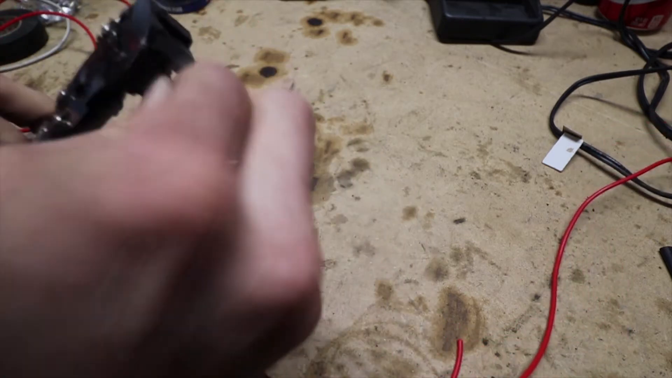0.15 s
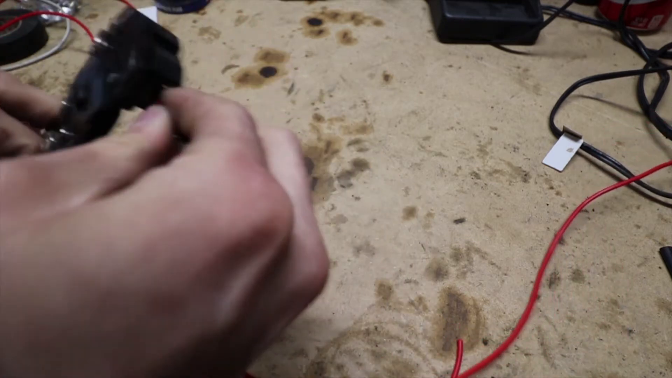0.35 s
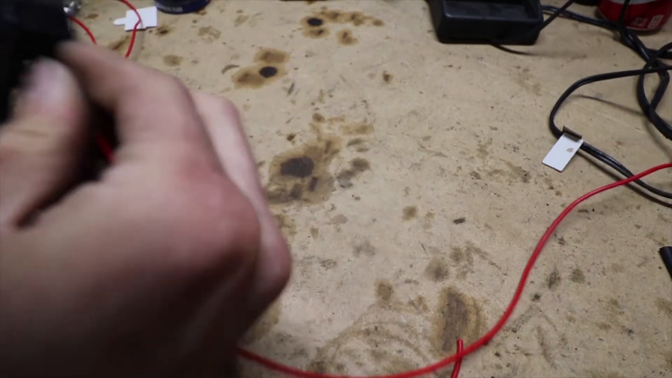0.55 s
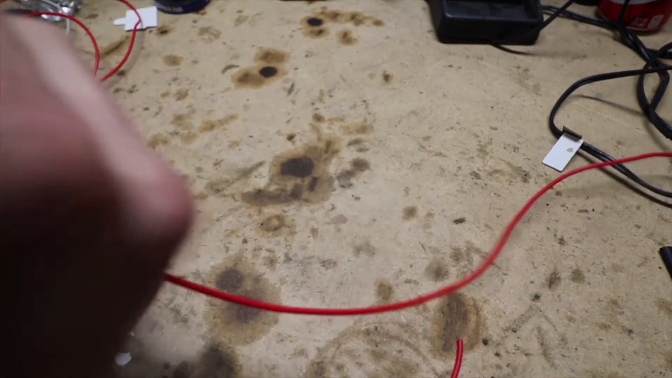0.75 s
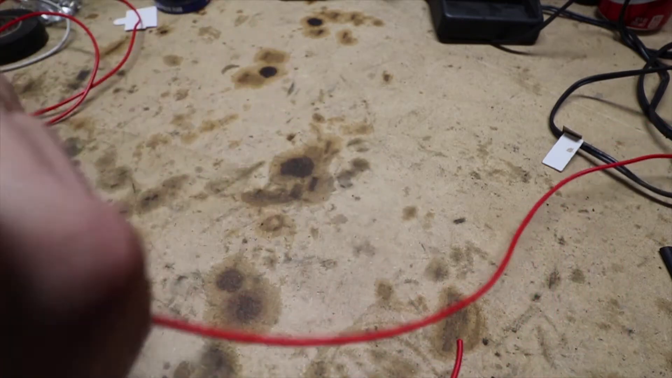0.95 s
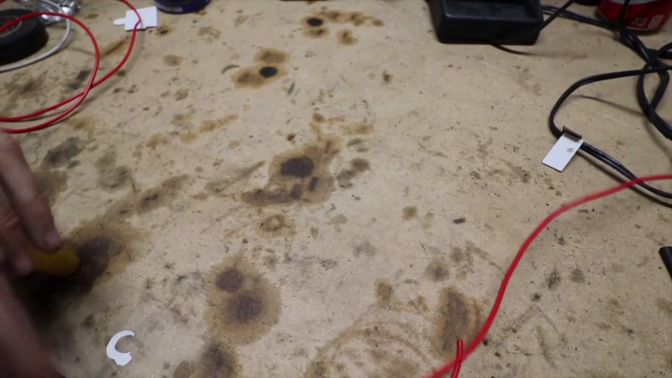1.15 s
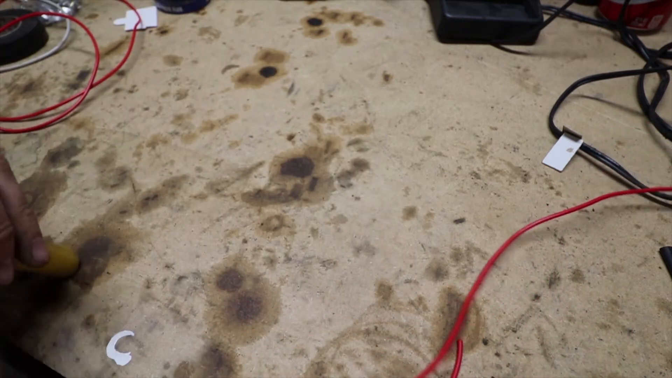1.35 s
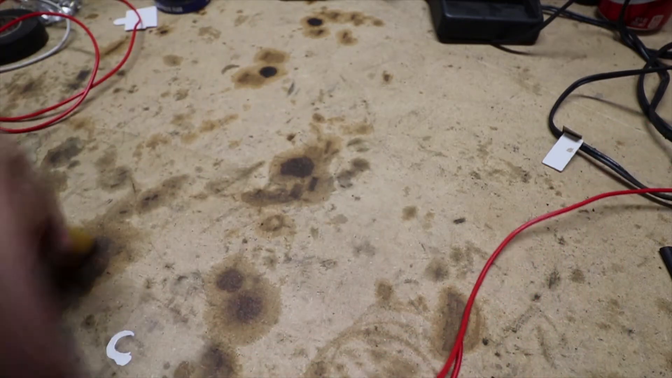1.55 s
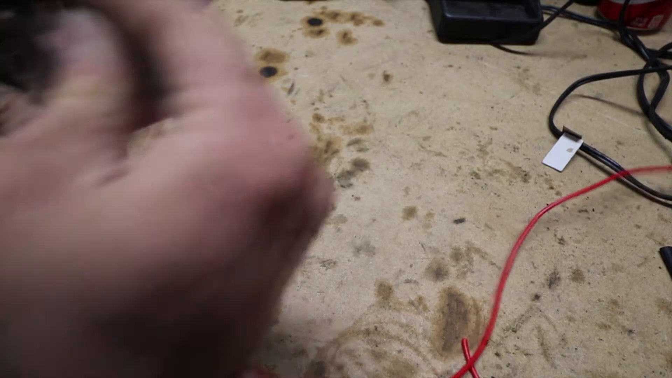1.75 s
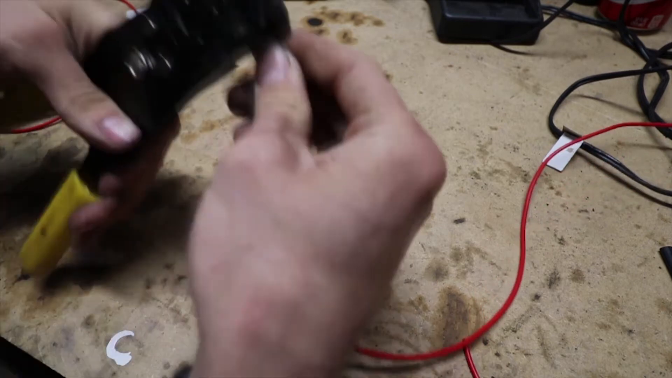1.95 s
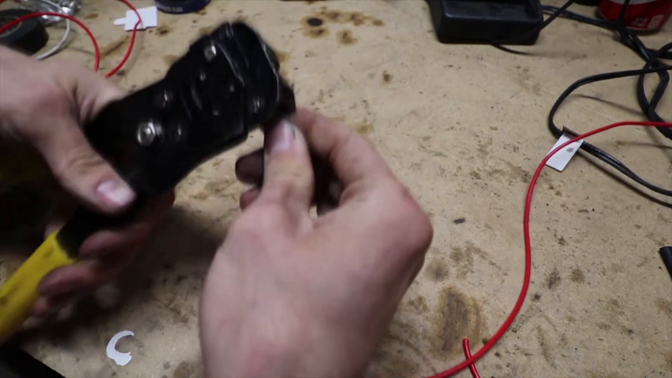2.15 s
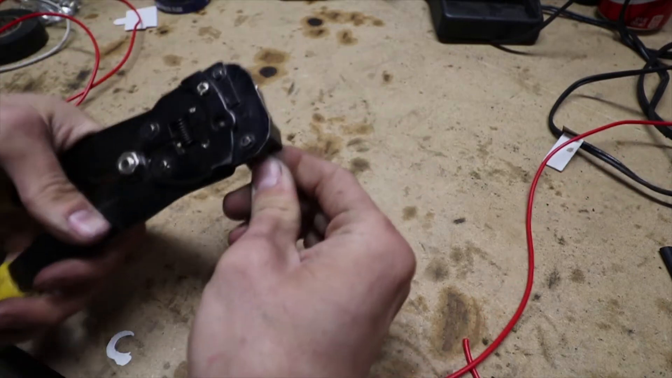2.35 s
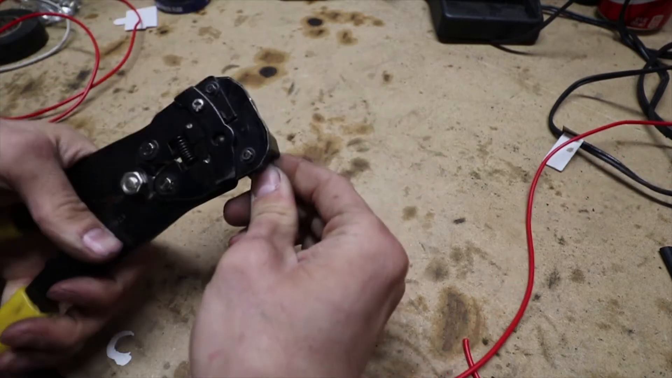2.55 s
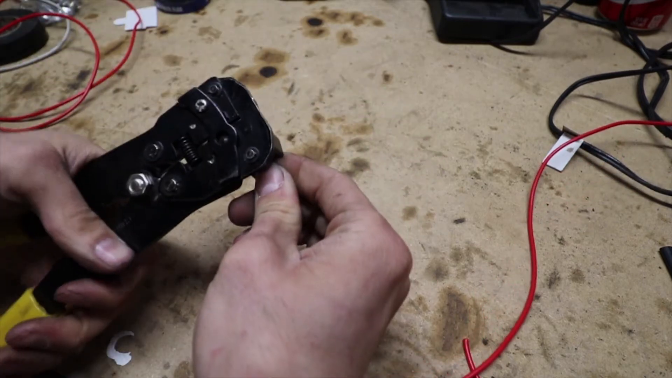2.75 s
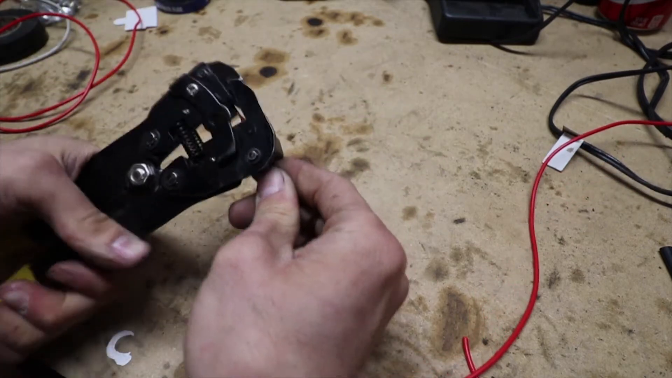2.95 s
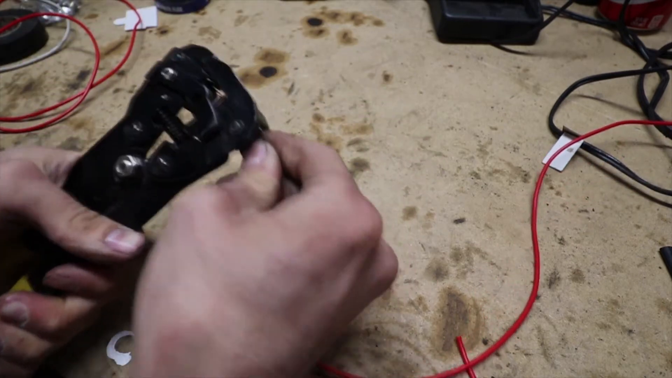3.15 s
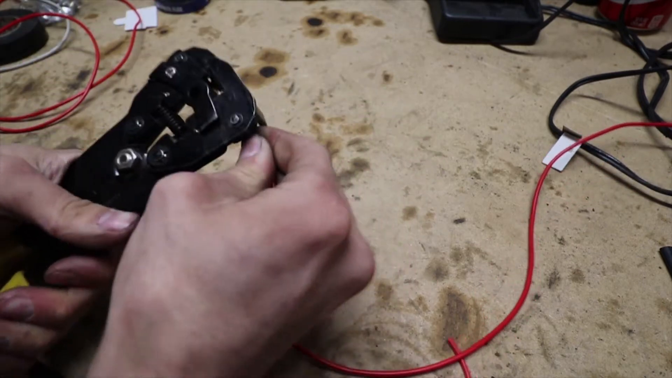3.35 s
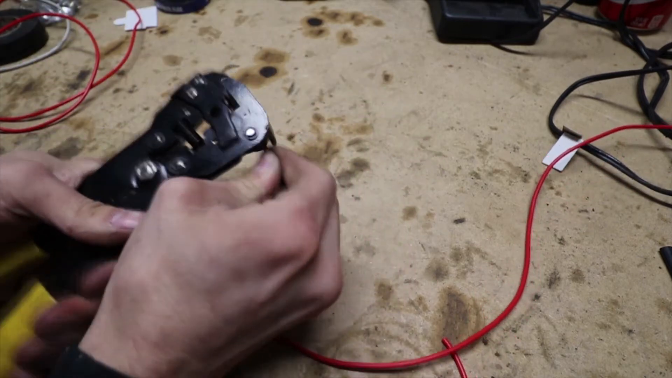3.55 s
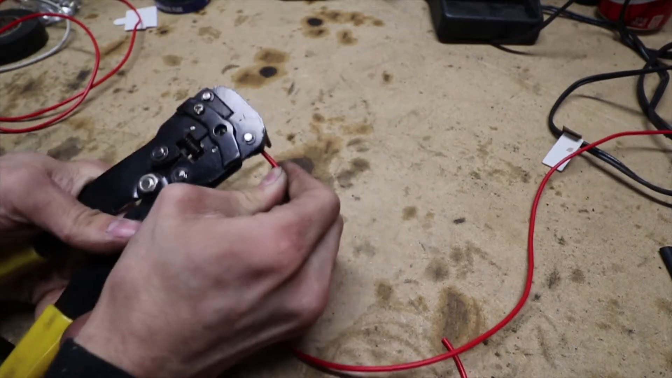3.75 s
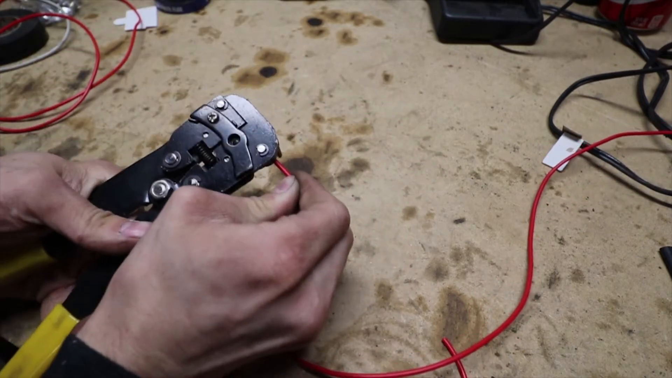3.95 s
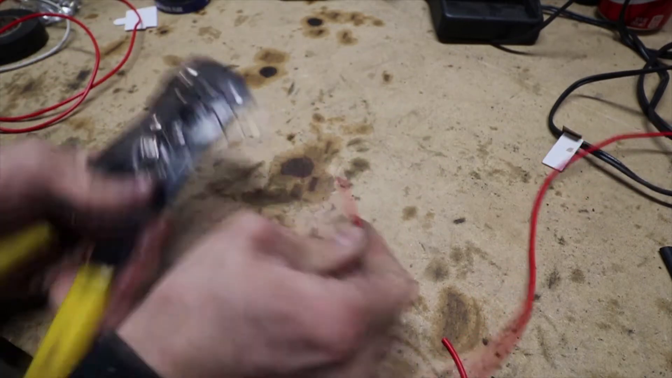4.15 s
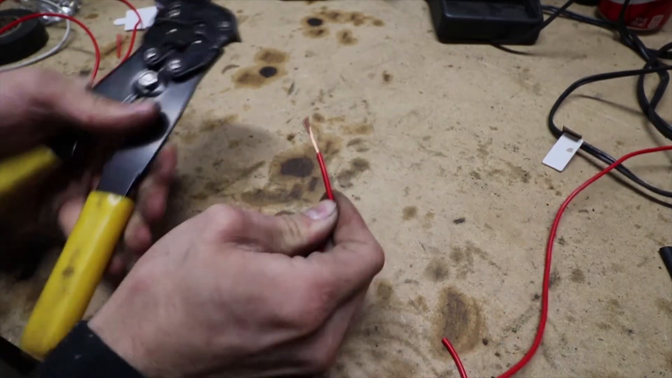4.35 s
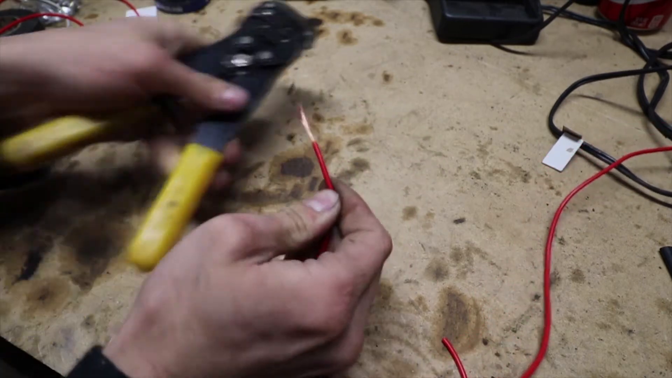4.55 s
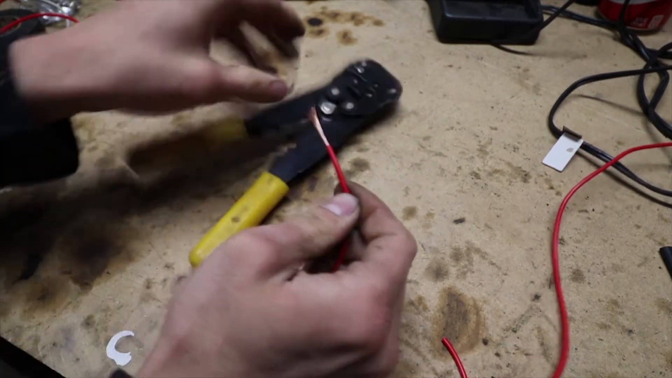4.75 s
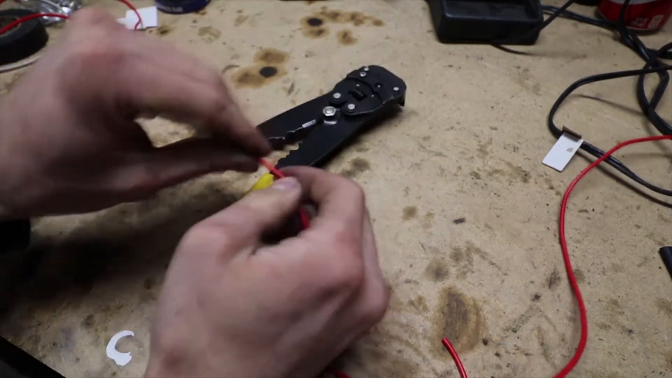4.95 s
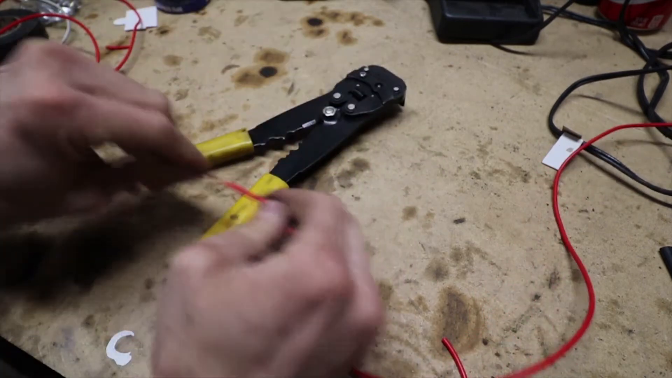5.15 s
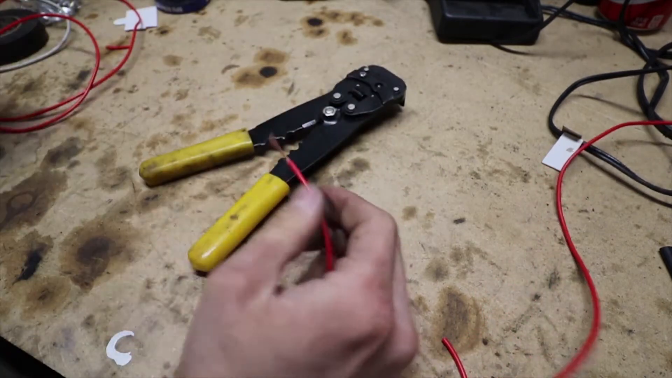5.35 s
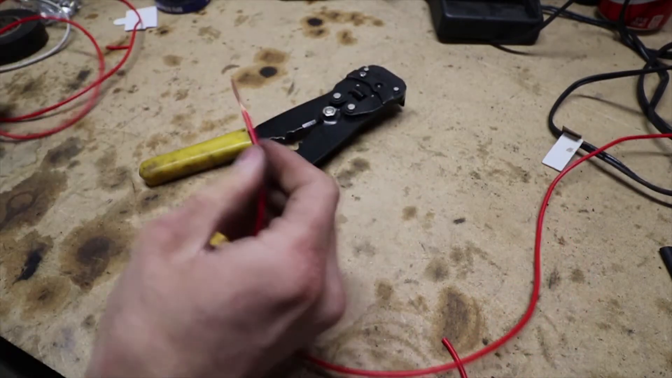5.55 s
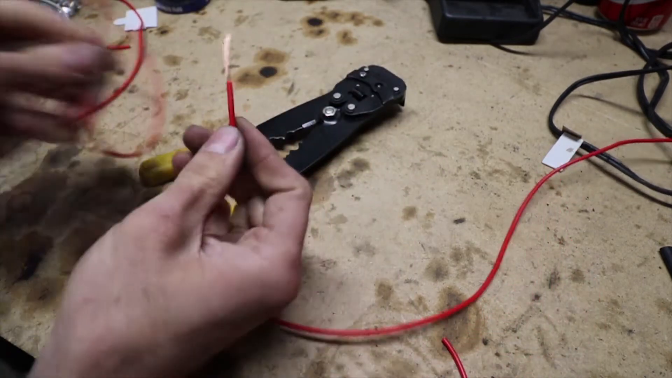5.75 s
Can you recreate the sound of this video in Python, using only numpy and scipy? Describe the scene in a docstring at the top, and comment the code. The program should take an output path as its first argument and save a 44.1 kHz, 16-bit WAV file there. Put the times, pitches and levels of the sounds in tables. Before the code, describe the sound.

Close over a wooden workbench in a small room, a steel wire stripper gives scattered faint clicks and soft hand rubs. Its jaws snap sharply, snap again, then tear insulation with a brief crunchy rip. The tool drops with a loud clatter, rattles and settles, followed by light taps and rubbing.

```python
"""Wire stripper on a workbench

A spring-loaded steel wire stripper is handled close to a microphone over a wooden workbench.
Links click as struck resonances, the jaws snap and tear insulation off in dense stick and slip, the spring sings.
The dropped tool bounces, rocks and rattles on ringing bench modes; rubbing strokes are showers of small slips.
Filtered noise makes the rumble and hiss below; filtered decaying noise makes the reflections."""
import sys
import numpy as np
from scipy import signal
from scipy.fft import rfft, irfft, next_fast_len
from scipy.io import wavfile
from scipy.ndimage import uniform_filter1d

SR = 44100
rng = np.random.default_rng(int(sys.argv[2]) if len(sys.argv) > 2 else 0)


def volts_from_db(level):
    """Convert decibel levels to linear amplitude ratios."""
    exponent = np.asarray(level, float) / 20
    return 10 ** exponent


def unload_wav(signal):
    """Save mono or channel-first audio to the path in sys.argv[1] as 16-bit WAV at rate SR, clipped to [-1, 1]."""
    wavfile.write(
        sys.argv[1],
        SR,
        np.round(np.clip(np.atleast_2d(signal).T, -1, 1) * 32767).astype(np.int16),
    )


N = 255559   # length in samples


def rms_one(x):
    """Scale to rms 1."""
    return x / np.sqrt(np.mean(x ** 2) + 1e-20)


def along(at_s, level_db):
    """Gain along a curve in dB, practically silent outside it."""
    return volts_from_db(np.interp(np.arange(N) / SR, at_s, level_db, left=-200, right=-200))


def resonances(table, size):
    """Complex response of each damped mode (pitch_hz, width_hz, level_db) on an FFT grid."""
    hz, width_hz, level_db = (column[:, None] for column in np.transpose(table))
    f = np.fft.rfftfreq(size, 1 / SR) + 1e-3   # keeps clear of zero
    signs = (-1.) ** np.arange(len(table))[:, None]   # neighbours in opposite polarity
    return signs * volts_from_db(level_db) / (1 + 1j * (f ** 2 - hz ** 2) / (f * width_hz))


def coloured(x, table):
    """A signal sent through parallel resonances, then scaled to rms 1."""
    size = next_fast_len(N)
    response = resonances(table, size).sum(axis=0)
    return rms_one(irfft(rfft(x, size) * response, size)[:N])


def steady(spectrum, level_db):
    """Steady noise: white noise shaped by a spectrum curve and set to an rms level."""
    size = next_fast_len(N)
    hz, colour_db = np.transpose(spectrum)
    log_f = np.log(np.fft.rfftfreq(size, 1 / SR) + 1)
    colour = volts_from_db(np.interp(log_f, np.log(hz), colour_db))
    noise = irfft(rfft(rng.standard_normal(size)) * colour, size)[:N]
    return volts_from_db(level_db) * rms_one(noise)


# spectrum of room rumble and microphone hiss: pitch_hz, relative level_db
FLOOR_SPECTRUM = [(12, -68), (20, -74), (46, -6), (91, -6.5), (150, -4.5), (329, -7.5), (368, -8),
                  (412, -8), (461, -9.5), (954, -16), (1870, -20), (2090, -21.5), (5120, -23.5),
                  (14800, -28), (16100, -33)]


def floor_noise():
    """Room rumble and microphone hiss as one noise, alike in both channels."""
    return steady(FLOOR_SPECTRUM, level_db=-52)


# spectrum of the preamplifier hiss: pitch_hz, relative level_db
HISS_SPECTRUM = [(18, -30), (30, -1), (338, -5), (375, -1), (463, -6), (4330, -6.5), (14500, -6),
                 (16100, -18)]


def preamp_hiss():
    """A trace of preamplifier hiss, in opposite polarity in the two channels."""
    return steady(HISS_SPECTRUM, level_db=-64) * [[1], [-1]]


# handle modes: pitch_hz, width_hz (before the grip broadens it), level_db
HANDLE = [(872, 150, -1.5), (1417, 49, 3), (1592, 32, 3.5), (1846, 94, -1.5), (2185, 150, -5),
          (2820, 180, -5.5), (3500, 86, -12), (4030, 28, -3), (4580, 47, -10.5)]
# broad resonances of finger hiss: pitch_hz, width_hz, level_db
FINGERS = [(2610, 1200, -1), (4300, 1960, -1), (5400, 790, 2.5), (6760, 3600, -10), (9900, 5000, -13)]


def handle_and_fingers(grains_per_s=1800, grain_db=2.0):
    """Dense uneven slips of either sign ring the handle and hiss under the fingers."""
    slips = rng.random((2, N)) < grains_per_s / SR
    strength = volts_from_db(grain_db * np.minimum(rng.exponential(1, (2, N)), 4))
    slips = slips * strength * rng.choice([-1, 1], (2, N))
    damped_handle = [(hz, 2 * width_hz, level_db) for hz, width_hz, level_db in HANDLE]   # by the grip
    return coloured(slips[0], damped_handle), coloured(slips[1], FINGERS)


def blend(handle, fingers, handle_db):
    """Mix dull handle and bright fingers at constant power; handle_db is handle over fingers."""
    share = volts_from_db(handle_db)
    return (share * handle + fingers) / np.sqrt(1 + share ** 2)


# strokes of hands on tool, wire and bench: start_s, length_s, peak_db, handle_over_fingers_db
STROKES = [(0.324, 0.077, -58, 6), (0.411, .12, -56, 8), (0.689, 0.056, -56, 0), (0.769, 0.14, -59, -14),
           (1.037, 0.095, -55.5, -17), (1.11, .13, -54.5, 0), (1.3, .07, -56, 16), (1.37, 0.084, -57, 10),
           (1.553, 0.024, -51, 16), (1.726, 0.17, -49, 6), (1.852, .12, -40, 5), (1.961, .04, -46.5, -1),
           (2.057, .07, -50.5, 4), (2.138, 0.19, -62, 8), (2.601, 0.045, -56, -4), (2.753, .05, -61, 13),
           (3.578, .17, -55, -6), (3.781, 0.041, -55, 1), (4.13, 0.12, -59, -3), (4.355, 0.17, -56, -11),
           (4.487, 0.31, -55.5, -15), (5.207, 0.14, -44, -6.5), (5.358, 0.063, -46.5, 5),
           (5.44, .14, -49.5, 7), (5.591, 0.083, -48.5, 6), (5.683, 0.18, -45, 5)]
STROKE_PEAK_AT, STROKE_EDGE_DB = 0.52, -11.5   # peak as a share of the length; ends relative to it
FLICKER_DB, FLICKERS_PER_S = 2.5, 30   # the grip is uneven


def rubbing():
    """Each stroke swells and fades over slip noise whose level flickers at random."""
    handle, fingers = handle_and_fingers()
    steps = rng.standard_normal(1000)
    flicker_db = FLICKER_DB * np.interp(np.arange(N) / SR * FLICKERS_PER_S, np.arange(1000), steps)
    flicker = volts_from_db(flicker_db)
    out = np.zeros(N)
    for start_s, length_s, peak_db, handle_db in STROKES:
        at_s = [start_s, start_s + STROKE_PEAK_AT * length_s, start_s + length_s]
        swell = along(at_s, peak_db + np.array([STROKE_EDGE_DB, 0, STROKE_EDGE_DB]))
        out += flicker * swell * blend(handle, fingers, handle_db)
    return out


# the dropped tool settles on the bench: at_s, rocking_db, rattle_db (loose parts)
SETTLING = [(4.76, -36, -47), (4.79, -30.5, -37), (4.81, -37, -35), (4.85, -27.5, -36), (4.87, -24.5, -36),
            (4.895, -30.5, -32), (4.92, -28.5, -36), (4.96, -41, -41), (5.0, -63, -45), (5.06, -53, -50.5),
            (5.219, -67, -56)]


def rattle():
    """Loose parts of the dropped tool rattle as slip noise, more handle than fingers."""
    at_s, _, rattle_db = np.transpose(SETTLING)
    return along(at_s, rattle_db) * blend(*handle_and_fingers(), handle_db=4)


# bench top modes: pitch_hz, level_db, t60_s (ringing free)
BENCH = [(157, 1, 0.12), (200, -6, 0.041), (270, -4, 0.065), (396, 0.5, 0.088), (496, -1, 0.063),
         (648, -7, 0.049), (738, -3, 0.045), (983, 0.5, 0.08), (1353, 1, 0.032), (1515, -29, 0.042)]


def rocking(touches_per_s=900, damping=2.1, soft_hz=600):
    """Rapid uneven touches keep the bench modes sounding, broadened by the weight on them."""
    modes = []
    for hz, level_db, t60_s in BENCH:
        width_hz = damping * np.log(1000) / (np.pi * t60_s)
        soft_db = -20 * np.log10(1 + (hz / soft_hz) ** 2)   # soft grips leave the upper modes weak
        modes.append((hz, width_hz, level_db + soft_db))
    touches = (rng.random(N) < touches_per_s / SR) * rng.standard_normal(N)
    at_s, rocking_db, _ = np.transpose(SETTLING)
    return along(at_s, rocking_db) * coloured(touches, modes)


# return spring mode: pitch_hz, level_db, t60_s
SPRING = [(3650, -1, 0.66)]


def spring(let_go_s=3.777, spring_db=-55):
    """The return spring sings thinly, a decaying sine, once the jaws let go."""
    t = np.maximum(np.arange(N) / SR - let_go_s, 0)   # zero, so silent, until then
    out = np.zeros(N)
    for hz, level_db, t60_s in SPRING:
        out += volts_from_db(spring_db + level_db - 60 * t / t60_s) * np.sin(2 * np.pi * hz * t)
    return out


# knocks on the bench top: at_s, peak_db, strongest_hz, spread_octaves, share_of_free_t60
KNOCKS = [(1.74, -38, 160, 0.66, 0.52), (2.828, -32.5, 1010, 0.39, 0.28), (2.982, -29, 1000, 0.77, 0.3),
          (4.753, -17.5, 800, 2.1, 0.9), (4.778, -6, 925, 1.4, 0.57), (4.809, -25, 260, 1, 1),
          (4.856, -9.5, 340, 0.91, 0.89), (4.912, -18, 376, 1.9, 0.46), (5.288, -25, 750, 0.41, 0.18),
          (5.413, -23, 400, 1, 0.23)]


def knocks(settle_db=-24, settle_t60_s=0.032):
    """A push and a short noisy settling ring the bench modes, most near each blow's strongest pitch."""
    out, t = np.zeros(N + SR), np.arange(SR // 4) / SR
    hz, level_db, t60_s = (column[:, None] for column in np.transpose(BENCH))
    for at_s, peak_db, strongest_hz, octaves, share in KNOCKS:
        luck_db = 1.5 * rng.standard_normal((len(BENCH), 1))   # no two blows ring the modes alike
        focus = np.exp(-.5 * (np.log2(hz / strongest_hz) / octaves) ** 2)
        # a hand or tool left lying damps the ring
        dying = volts_from_db(level_db + luck_db - 60 * t / (share * t60_s))
        push = (focus * dying * np.sin(2 * np.pi * hz * t)).sum(axis=0)
        settling = rng.standard_normal(len(t)) * volts_from_db(settle_db - 60 * t / settle_t60_s)
        ring = push + signal.fftconvolve(push, settling)[:len(t)]
        out[int(at_s * SR):][:len(t)] += volts_from_db(peak_db) * ring / np.abs(ring).max()
    return out[:N]


# modes of the tool's frame: pitch_hz, width_hz, level_db
FRAME = [(800, 183, -1), (1030, 175, 1.5), (1330, 242, 2.5), (1530, 680, 0), (1910, 620, -6.5)]
# modes of its links: pitch_hz, width_hz, level_db
LINKS = [(2313, 326, -3.5), (2627, 95, 1), (3086, 590, -3), (3970, 760, -6.5), (4300, 327, -3),
         (4830, 750, -2.5), (5500, 1150, -1.5), (6220, 650, -3.5), (6590, 195, -6), (7470, 510, -9)]
# modes of its cutting edges: pitch_hz, width_hz, level_db
EDGES = [(7920, 400, -2), (9520, 1600, -2), (11060, 1400, -4), (12800, 2100, -10.5), (15300, 1500, -30),
         (14260, 540, -21)]
# the blades drag the insulation off the wire: at_s, level_db
TEAR = [(4.198, -52), (4.205, -38), (4.214, -51), (4.218, -25), (4.234, -26.5), (4.24, -31), (4.247, -27),
        (4.255, -54)]
TEAR_FRAME_DB, TEAR_EDGE_DB = -12, -4.5   # relative to the links
TEAR_HZ, TEAR_FOCUS_DB = 5500, 6   # links near this pitch ring most; loss one octave away


def tear(slips_per_s=5000):
    """Dense stick and slip of the blades rings the whole tool."""
    slips = (rng.random(N) < slips_per_s / SR) * rng.standard_normal(N)
    focused_links = [(hz, width_hz, level_db - TEAR_FOCUS_DB * np.log2(hz / TEAR_HZ) ** 2)
                     for hz, width_hz, level_db in LINKS]
    tool = coloured(slips, focused_links)
    tool = tool + volts_from_db(TEAR_FRAME_DB) * coloured(slips, FRAME)
    tool = tool + volts_from_db(TEAR_EDGE_DB) * coloured(slips, EDGES)
    return along(*np.transpose(TEAR)) * rms_one(tool)


# steel contacts: at_s, level_db (links), brightest_hz, frame_db and edge_db (relative to level_db)
CLICKS = [(0.1106, -19.5, 4250, -12.5, -14), (0.1217, -31.5, 5540, -20, -15),
          (0.1248, -28.5, 5430, -24, -18), (0.244, -40.5, 4640, -11, -18), (0.325, -36, 5400, -9, -5),
          (0.5726, -33.5, 4400, -10.5, -7), (0.5806, -35, 5040, -13, -15), (0.67, -42, 6040, -2, 2),
          (0.6792, -26.5, 3930, -17, -15), (0.751, -34.5, 4900, -25, -3),
          (0.8456, -30.5, 5200, -13.5, -5.5), (0.8547, -30.5, 5900, -30, -12), (0.941, -39, 3660, -24, -9),
          (1.1137, -38.5, 3350, -7, -9), (1.193, -42.5, 4700, -2, -9), (1.3673, -41, 5350, -5, -13),
          (1.6281, -33, 4730, -23, -29), (1.887, -36, 5500, -21, -1.5), (2.072, -40, 2570, 3, -18),
          (2.0752, -38, 2250, 0, -17), (2.0902, -41.5, 2320, -11, -22), (2.142, -43, 4530, -16, -13),
          (2.8607, -34, 5200, -7, -26), (2.865, -37, 5100, -14, -12), (2.9695, -45, 5100, -22, -16),
          (2.9766, -17, 5500, -16, -20), (2.9816, -10, 3840, -8.5, -7.5), (3.032, -41, 4240, -19, -9),
          (3.49, -42.5, 3500, -4, -20), (3.635, -44, 4300, -1, -6), (3.7071, -36.5, 5340, -17, -13),
          (3.7523, -18, 6240, -15.5, -2), (3.7717, -15.5, 5900, -25, -12), (3.7732, -19.5, 5500, -18, -10),
          (3.776, -21, 5440, -16, -0.5), (3.7923, -33, 3500, -13, -10), (4.2258, -13, 5400, -20, 2.5),
          (4.2311, -10.5, 5330, -17.5, -4), (4.2434, -14.5, 5500, -29, 2), (4.246, -13.5, 4470, -15.5, -9),
          (4.3376, -26.5, 4460, -9, -3.5), (4.3431, -22, 5370, -7.5, -12), (4.354, -33, 3550, -3.5, -14),
          (4.468, -34, 5000, -13, -8), (4.47, -29, 5140, -8.5, -7), (4.4745, -26.5, 5240, -14, -6),
          (4.537, -39, 4700, -9, -6), (4.7525, -18.5, 3500, -9, -22), (4.7552, -5.5, 4850, -18, -14),
          (4.7595, -18, 5300, -5, 5), (4.778, -1, 4430, 2, -11), (4.7881, -28, 4400, 4, 9.5),
          (4.8141, -19, 2710, -4, -13), (4.8574, -8.5, 4600, -1.5, -9), (4.883, -18, 3600, -16, -17),
          (4.914, -32, 4500, -6, 2), (5.223, -41, 6500, -14, 3), (5.4126, -21.5, 4200, -3.5, -36),
          (5.446, -31, 4470, -20, -10), (5.6038, -37.5, 3200, -3, -10)]
# a faint tick of a loose link in each stroke: middle level and its spread, usual pitch, relative levels
TICK_DB, TICK_SPREAD_DB, TICK_HZ, TICK_FRAME_DB, TICK_EDGE_DB = -49, 4, 4400, -7, -12


def contacts():
    """The listed contacts and one faint tick at a random place in each stroke, as columns."""
    start_s, length_s = np.transpose(STROKES)[:2]
    tick_s = np.minimum(start_s + rng.random(len(start_s)) * length_s, N / SR)
    luck = rng.standard_normal((2, len(start_s)))
    ticks = [(at_s, TICK_DB + TICK_SPREAD_DB * a, TICK_HZ * 1.1 ** b, TICK_FRAME_DB, TICK_EDGE_DB)
             for at_s, a, b in zip(tick_s, *luck)]
    return np.transpose(CLICKS + ticks)


CHATTER_T60_S = 0.014
EDGE_LEAN_DB, PLAIN_HZ = 30, 4900   # dB per octave of edge mode, per octave of brightness above plain


def clicks(focus_octaves=0.4, size=2048):
    """Each contact is a sharp strike and a dying chatter that ring frame, links and cutting edges."""
    at_s, level_db, brightest_hz, frame_db, edge_db = contacts()
    t = np.arange(size) / SR
    force = rng.standard_normal((len(at_s), size)) * volts_from_db(-60 * t / CHATTER_T60_S)
    force[:, 0] = 8   # the strike
    luck = volts_from_db(1.5 * rng.standard_normal((len(at_s), 32)))   # uneven mode strengths
    # the place of the contact favours the link modes near its brightest pitch
    octaves = np.log2(np.array(LINKS)[:, 0] / brightest_hz[:, None])
    focus = 0.23 + np.exp(-.5 * (octaves / focus_octaves) ** 2)
    # bright contacts also lean toward the highest edge modes
    brightness = np.log2(brightest_hz[:, None] / PLAIN_HZ)
    lean = volts_from_db(EDGE_LEAN_DB * brightness * np.log2(np.array(EDGES)[:, 0] / EDGES[0][0]))
    bursts = 0
    for table, weight, rel_db in ((FRAME, 1, frame_db), (LINKS, focus, 0), (EDGES, lean, edge_db)):
        strengths = weight * luck[:, :len(table)]
        ring = irfft(rfft(force) * (strengths @ resonances(table, size)), size)
        # approximate peak, from the strongest 40 samples
        top = np.sqrt(2 * uniform_filter1d(ring ** 2, size=40).max(axis=1))
        bursts = bursts + ring * (volts_from_db(level_db + rel_db) / top)[:, None]
    out = np.zeros(N + size)
    for first, burst in zip((at_s * SR).astype(int) - 8, bursts):   # 8 samples ahead
        out[first:first + size] += burst
    return out[:N]


# reflections by band: centre_hz, t60_s, level_db
ROOM = [(200, 0.71, -12.5), (700, 0.48, -15.5), (1860, 0.36, -13.5), (3200, 0.18, -20.5), (5400, 0.47, -19),
        (7800, 0.29, -13), (11800, 0.19, -14.5)]
EARLY_T60_S, EARLY_DB = 0.027, 4.5   # the quick scatter, relative to the tail


def room(x, delay_s=.003):
    """Dense reflections: a quick scatter off the cluttered bench and a tail dying at each band's rate."""
    t = np.arange(SR // 2) / SR
    centres = np.array(ROOM)[:, 0]
    edges = np.r_[60, np.sqrt(centres[1:] * centres[:-1]), 16000]
    early = volts_from_db(-60 * t / EARLY_T60_S)
    early = volts_from_db(EARLY_DB) * early / np.sqrt(np.sum(early ** 2))
    response = 0
    for (_, t60_s, level_db), low, high in zip(ROOM, edges, edges[1:]):
        late = volts_from_db(-60 * t / t60_s)
        dying = late / np.sqrt(np.sum(late ** 2)) + early
        white = volts_from_db(level_db) * dying * rng.standard_normal(len(t))
        band = signal.butter(2, [low, high], "band", fs=SR, output="sos")
        response = response + signal.sosfilt(band, white)
    delay = np.zeros(int(delay_s * SR))
    return signal.fftconvolve(x, np.r_[delay, response])[:N]


def scene():
    """One microphone, weak in the bass, feeds both channels; noise lies below."""
    bench = rubbing() + rattle() + rocking() + spring() + knocks() + tear() + clicks()
    bass_cut = signal.butter(4, 111, "high", fs=SR, output="sos")
    bench = signal.sosfilt(bass_cut, bench + room(bench))
    return bench + floor_noise() + preamp_hiss()


def roll_off(x):
    """The treble ends steeply here."""
    return signal.sosfilt(signal.butter(12, 16290, fs=SR, output="sos"), x)


def record(dry):
    """Peaks beyond full scale clip, as in the loudest blow."""
    mix = np.clip(dry, -1, 1)
    return roll_off(mix)


dry = scene()
out = record(dry)
unload_wav(out)
```